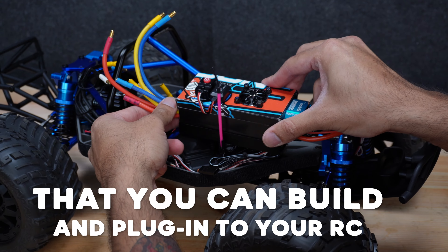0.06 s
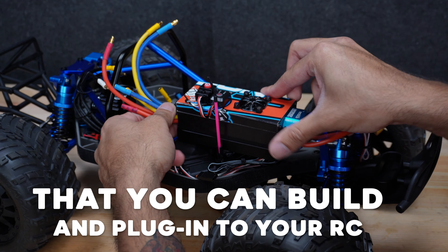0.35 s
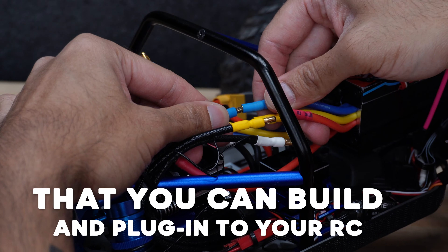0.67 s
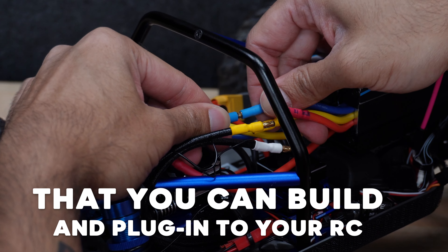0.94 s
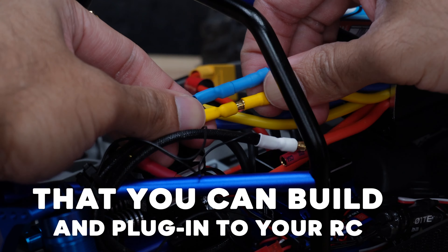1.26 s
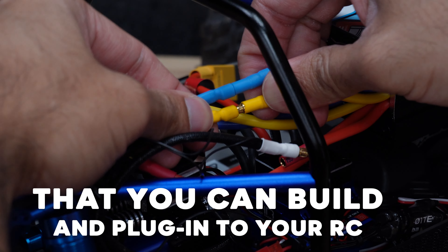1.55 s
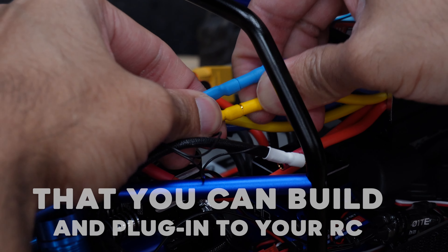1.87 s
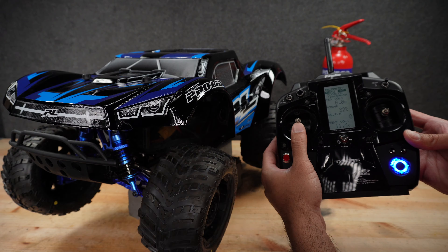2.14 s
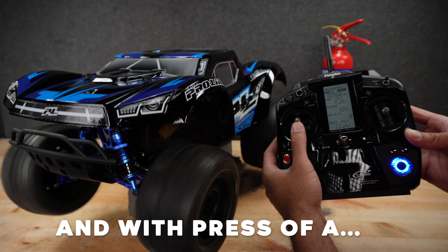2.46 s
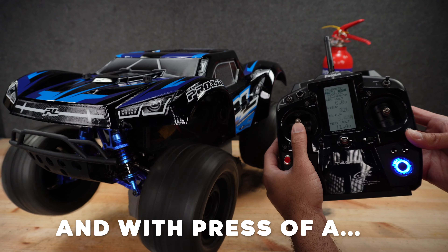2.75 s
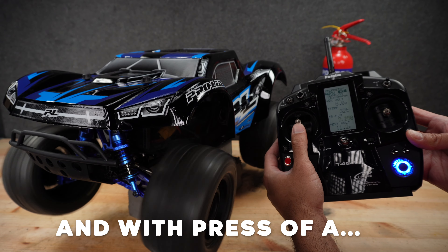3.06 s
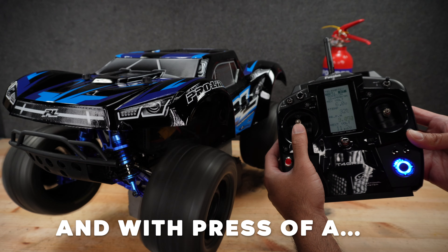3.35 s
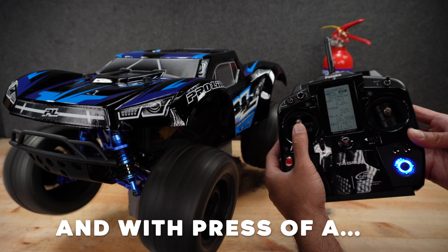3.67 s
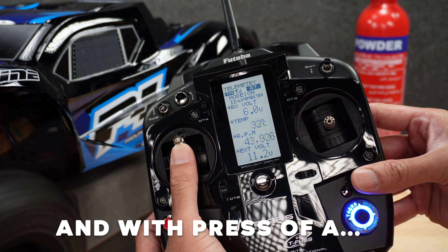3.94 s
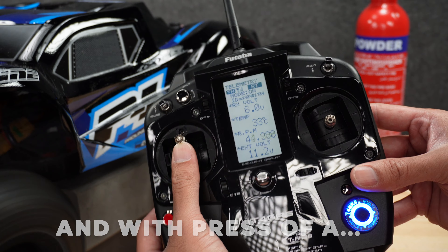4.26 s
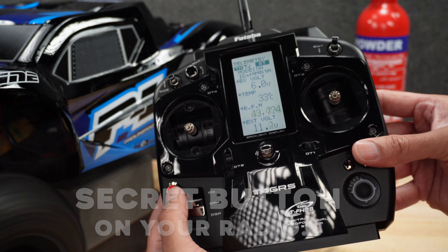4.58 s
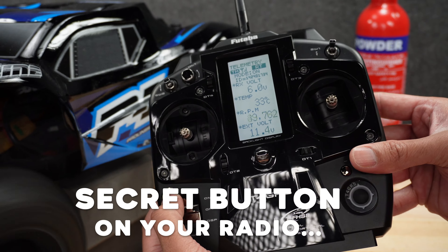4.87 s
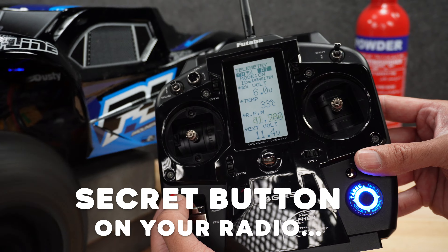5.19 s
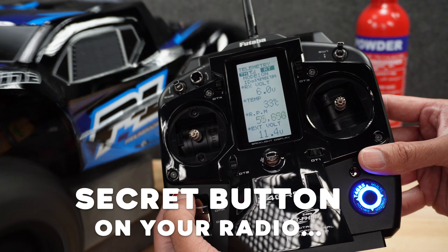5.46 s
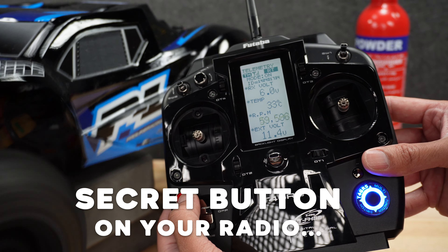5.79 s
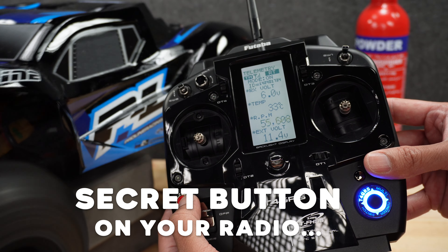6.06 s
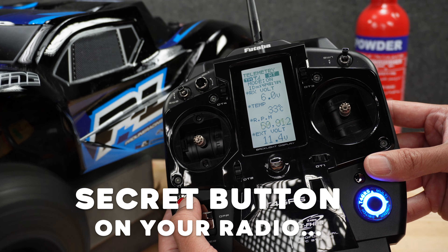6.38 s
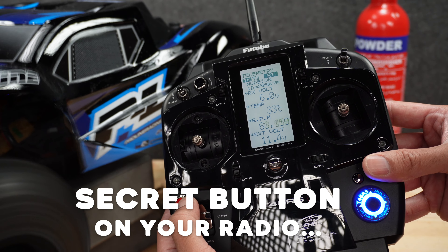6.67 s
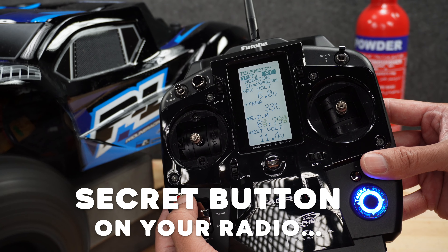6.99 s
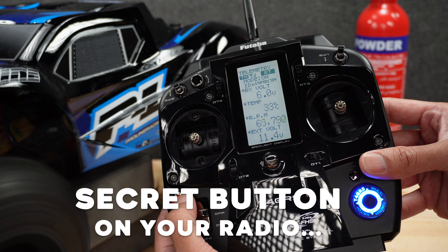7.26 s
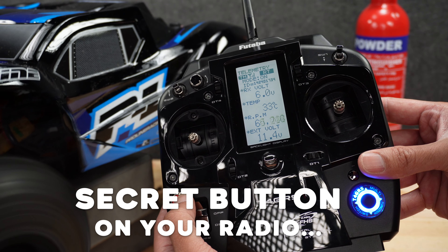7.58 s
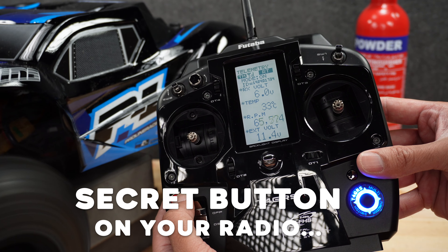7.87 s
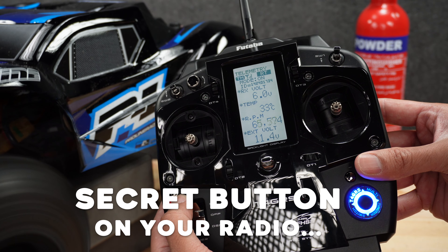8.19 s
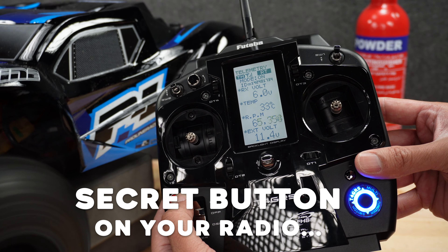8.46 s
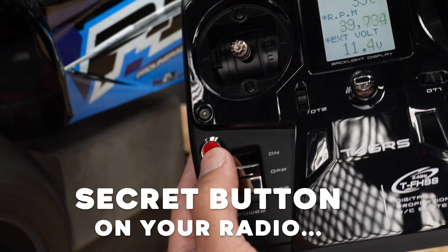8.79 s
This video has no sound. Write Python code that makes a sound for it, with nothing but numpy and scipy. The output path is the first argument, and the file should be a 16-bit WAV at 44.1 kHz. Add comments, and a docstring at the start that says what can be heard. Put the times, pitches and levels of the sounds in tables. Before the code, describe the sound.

A quiet workshop hum opens. At about 0.2 seconds a battery knocks into a model truck's plastic tray with a soft bench thump, followed by small clicks near 0.5, 1.3 and 2 seconds as plugs go in. A small fan starts softly at 2.2 seconds. At 2.4 the gears clunk and the electric motor spins the free wheels up: a loud rising whine with chattering gears, rattling shafts and low tyre shake, heard from a step away. It climbs again at 2.9, with two brief high metal squeaks around 3.5. From 3.9 seconds the sound is close, denser and brighter. It sags slightly with a thin gear squeal, rises at 4.9 and again at 5.7, then holds a high, steady, cleaner whine over the rattle. At about 8.6 seconds it drops abruptly to a lower, coasting whine.

```python
"""Clicks and knocks over a quiet workshop hum, a small fan, a clunk, then a rising, rattling whine.
A battery and motor leads are plugged into a model truck on a workbench. Its cooling fan starts, and
its brushless motor spins the free wheels up in steps to full speed, heard first from a step away,
then close by. Gear teeth whine and chatter in the gaps between them, drive shafts rattle the
chassis (the truck's frame), and unbalanced tyres shake it."""
import sys
import numpy as np
from scipy import signal
from scipy.fft import rfft, irfft, next_fast_len
from scipy.io import wavfile
from scipy.ndimage import uniform_filter1d

SR = 44100
rng = np.random.default_rng(int(sys.argv[2]) if len(sys.argv) > 2 else 0)


def log_audio(samples):
    """Write samples as a 16-bit WAV file to the path given in sys.argv[1]."""
    # one column per channel
    frames = np.atleast_2d(samples).T
    # limit to full scale, then quantise
    limited = np.clip(frames, -1, 1)
    pcm = np.round(limited * 32767).astype(np.int16)
    wavfile.write(sys.argv[1], SR, pcm)


N = 389403
TIME = np.arange(N) / SR
FREQ = np.fft.rfftfreq(N, 1 / SR)
FAN_ON_S, MOTOR_ON_S, CLOSE_S = 2.178, 2.37, 3.895  # from CLOSE_S on, the truck is heard close by
TEETH_PER_TURN = 37.58  # how often gear teeth meet in one turn of the wheels

# Pushes of the throttle. Each row: start and release in seconds, target in wheel turns per second,
# lag in seconds.
PUSHES = [(2.33, 2.88, 17.5, .19), (2.88, 3.8, 32.3, .23), (3.8, 4.35, 30.5, .25), (4.87, 5.28, 39.2, .16),
          (5.7, 8.586, 45.25, .335)]


def undb(db):
    """Turn decibels into a gain."""
    return 10 ** (np.asarray(db) / 20)


def unit(x):
    """Scale a signal to an average (rms) level of 1."""
    return x / np.sqrt(np.mean(x ** 2))


def after(s):
    """A quick fade-in starting at s seconds."""
    return np.clip((TIME - s) / 0.0092, 0, 1)


def shape(points):
    """A gain for every frequency, drawn through (Hz, dB) points."""
    hz, db = np.transpose(points)
    return undb(np.interp(np.log(FREQ + 1), np.log(hz), db))


def filtered(x, gain):
    """Give each frequency of a signal its own gain."""
    size = next_fast_len(N + 4096, True)
    return irfft(rfft(x, size) * np.interp(np.fft.rfftfreq(size, 1 / SR), FREQ, gain), size)[:N]


def noise(points):
    """Noise of level 1, coloured by (Hz, dB) points."""
    return unit(filtered(rng.standard_normal(N), shape(points)))


def wander(rate):
    """A smooth random curve of level 1 that changes about rate times a second."""
    hold = max(int(SR / rate), 1)
    steps = np.repeat(rng.standard_normal(N // hold + 1), hold)
    return unit(uniform_filter1d(uniform_filter1d(steps, hold), hold)[:N])


def sine(turns):
    """A sine wave of level 1, one cycle per turn."""
    return np.sqrt(2) * np.sin(2 * np.pi * turns)


def tones(turns, table):
    """Slightly unsteady tones that follow the turning wheels."""
    return sum(undb(db + .7 * wander(14)) * sine(multiple * turns + .03 * wander(40))
               for multiple, db in table)


def workshop():
    """The room's soft rush of air and steady hum."""
    # The air. Each row: frequency in Hz, relative level in dB.
    air = [(21, -44), (35, 2), (60, -2.5), (76, -14), (157, -3), (174, -10.5), (243, -4), (307, -11),
           (528, -5), (799, -14), (1830, -19), (1980, -22), (6160, -32), (16900, -39)]
    # The hum. Each row: pitch in Hz, level in dB.
    hum = [(247.6, -68), (586.8, -66), (1793, -75)]
    return undb(-55) * noise(air) + sum(undb(db) * sine(hz * TIME + .24 * wander(33)) for hz, db in hum)


def cooling_fan():
    """The speed controller's fan whirrs: rushing air and two tones."""
    # The moving air. Each row: frequency in Hz, relative level in dB.
    air = [(59, -76), (100, -46), (239, -14), (266, 0), (302, -32), (328, 1), (406, -27), (662, -17),
           (721, -12.5), (1060, -12), (1330, -7), (2370, -21), (4770, -24), (16000, -34)]
    # The fan's tones. Each row: pitch in Hz, level in dB.
    whirr = [(275, -79), (1378, -56.5)]
    rush = undb(-47.5) * noise(air)
    return rush + sum(undb(db) * sine(hz * TIME + .1 * wander(80)) for hz, db in whirr)


def blow(s, db, colour, ring_s, rise_s, tail_db):
    """A burst of noise that dies by 60 dB in ring_s seconds, followed by the room's faint echo."""
    age = TIME - s
    onset = np.exp(np.clip(age / rise_s, -60, 0))
    fade = undb(-60 * np.clip(age / ring_s, 0, 9)) + undb(tail_db - 60 * np.clip(age / 0.35, 0, 9))
    burst = filtered(rng.standard_normal(N), colour) * onset * fade
    return undb(db) * burst / np.max(np.abs(burst))


def battery_and_plugs():
    """Plastic rings as the battery drops into its tray and the plugs click home."""
    # The plastic's ring. Each row: frequency in Hz, relative level in dB.
    plastic = [(35, -41), (60, -10), (306, -10), (551, 4), (884, -5.5), (1150, -1.5), (1630, -7.5),
               (1930, -5), (3730, -19.5), (7220, -29), (8320, -26.5), (10500, -38), (14000, -41),
               (15700, -41), (16900, -72)]
    # Each row: time in seconds, peak in dB, treble tilt in dB per octave, ring and rise in seconds.
    clicks = [(0.151, -34.5, 7, 0.096, 0.01), (.188, -19.5, -0.5, 0.021, 0.00068),
              (.198, -21, 1.5, 0.031, 0.00041), (.363, -46, 3.5, .04, 0.0048), (0.466, -43, 6, 0.11, .004),
              (.493, -31, 3, 0.081, 0.0016), (.53, -37, 2, 0.096, .002), (1.278, -43, 5, .05, 0.0044),
              (1.975, -35.5, 8, 0.053, .0005), (2.007, -38, 2, .03, .001), (2.092, -42.5, 7, 0.019, .001)]
    octaves = np.log2(FREQ / 1000 + .1)
    return sum(blow(s, db, shape(plastic) * undb(tilt * octaves), ring_s, rise_s, tail_db=-25)
               for s, db, tilt, ring_s, rise_s in clicks)


def clunk():
    """The gears knock together as they take up their slack."""
    # The clunk's ring. Each row: frequency in Hz, relative level in dB.
    colour = [(59, -45), (100, -30), (244, -6.5), (315, -24), (634, 2.5), (854, -18), (1230, -2),
              (1830, -23), (2000, -8), (2420, -16), (10500, -25.5), (11400, -16.5), (16000, -47)]
    # The knocks. Each row: time in seconds, peak in dB, ring in seconds.
    knocks = [(2.352, -22.5, 0.049), (2.36, -21, 0.054), (2.384, -21, 0.041)]
    return sum(blow(s, db, shape(colour), ring_s, rise_s=0.0018, tail_db=-21) for s, db, ring_s in knocks)


def bench_thumps():
    """Handling and the starting jolt rock the truck on its bench."""
    # Low notes. Each row: start in seconds, pitch in Hz, peak in dB, ring in seconds.
    thumps = [(.19, 42, -40, 0.43), (0.192, 170, -54, 0.18), (0.198, 538, -41, 0.28),
              (1.978, 48, -46, 0.46), (2.373, 36.5, -35, 0.83), (2.375, 93, -37, 0.43)]
    sound = 0
    for s, hz, db, ring_s in thumps:
        age = np.maximum(TIME - s, 0)
        sound += undb(db - 60 * age / ring_s) * np.sin(2 * np.pi * hz * age)
    return sound


def squeaks(pitch_hz=11600, width_hz=1400):
    """Metal parts rub for an instant and ring high."""
    # The rubs. Each row: time in seconds, peak in dB.
    rubs = [(3.428, -35), (3.662, -28)]
    colour = 1 / (1 + ((FREQ - pitch_hz) / width_hz) ** 2)
    return sum(blow(s, db, colour, ring_s=0.12, rise_s=0.0079, tail_db=-22) for s, db in rubs)


def wheel_speed(coast_s=4.2, cut_s=8.586, after_cut_hz=29):
    """Wheel turns per second: each push pulls them toward its target, and drag slows them between."""
    hz = np.zeros(N)
    for start, release, target, lag in PUSHES:
        pushed_s = np.clip(TIME - start, 0, release - start)
        driven = target + (hz[int(start * SR)] - target) * np.exp(-pushed_s / lag)
        hz = np.where(TIME < start, hz, driven * np.exp(-np.maximum(TIME - release, 0) / coast_s))
    # at the end the sound cuts abruptly to slower, coasting wheels
    return np.where(TIME < cut_s, hz, after_cut_hz * np.exp((cut_s - TIME) / coast_s))


def gear_state(wheel_hz, top_hz=45.3, full_strain_hz_per_s=50.4, build_s=0.14):
    """Three curves, each about 0 to 1: loose gears, the strain of speeding up, and throttle off."""
    loose = np.clip((top_hz - wheel_hz) / 13, 0, 1) ** 0.37  # gears press tight near top speed
    gaining = np.maximum(np.gradient(wheel_hz) * SR, 0) / full_strain_hz_per_s
    held = sum(1. * (TIME >= start) * (TIME < release) for start, release, _, _ in PUSHES)
    span = int(build_s * SR)
    strain, coasting = (uniform_filter1d(x, span, origin=(span - 1) // 2) for x in (gaining, 1 - held))
    return loose, strain, coasting


def layer_levels(wheel_hz, strain, close, cruise_hz=30):
    """Speed and strain set the dB of the rattle, its share of treble, the whine and the tyre shake."""
    # Those four layers, from a step away and close by. Each row: relative dB at cruising speed,
    # dB added per doubling of speed, dB added at full strain.
    far_levels = [(-33, 7.5, -3), (-10, 2, -0.5), (-35.2, 12.5, -7.5), (-48, 1.5, 4)]
    near_levels = [(-24, 0.6, 2), (-4, -3, -3.5), (-29.5, 3, 3.5), (-35.5, 2, 3)]
    doublings = np.log2(np.maximum(wheel_hz, 1) / cruise_hz)
    far, near = (np.array([db + speed_db * doublings + strain_db * strain
                           for db, speed_db, strain_db in rows]) for rows in (far_levels, near_levels))
    return far * (1 - close) + near * close


def chassis(depth_db):
    """A gain curve that lifts the frequencies at which the chassis rings."""
    # Its resonances. Each row: frequency in Hz, width in Hz, relative height in dB.
    resonances = [(600, 85, 10), (1217, 150, 11), (2008, 320, 8.5), (2520, 60, 1), (2630, 67, 0.5),
                  (3150, 240, 3), (3670, 110, 2.5), (4230, 70, 4), (5300, 71, 4), (7640, 90, -2),
                  (9830, 300, -3), (15000, 420, 17)]
    peaks = sum(undb(db + depth_db) ** 2 / (1 + (2 * (FREQ - hz) / width) ** 2)
                for hz, width, db in resonances)
    return np.sqrt(1 + peaks)


def shudder(strain):
    """The chassis shudders under strain."""
    # The shudder's colour. Each row: frequency in Hz, relative level in dB.
    colour = [(25, -7), (60, -5), (110, -1), (170, -2), (260, -9), (420, -9.5), (700, -5), (1500, -38)]
    return undb(-29.5) * strain * noise(colour)


def tyres(turns, loose):
    """Unbalanced tyres shake the stand once a turn and flutter as they balloon."""
    # The shaking. Each row: shakes per wheel turn, relative level in dB.
    unbalance = [(1.002, 4.5), (2.028, 1.5), (2.149, -9), (3.03, -9), (4.05, -14), (7, -15)]
    # The flutter. Each row: frequency in Hz, relative level in dB.
    rumble = [(18, -9), (35, 9.5), (65, -18), (100, 4.5), (140, -18.5), (250, -20.5), (500, -45)]
    shake = sum(undb(db + 1.5 * wander(10)) * sine(multiple * turns + (.02 + .06 * loose) * wander(9))
                for multiple, db in unbalance)
    return undb(-3) * unit(shake) + undb(-7.5 + 6.9 * loose) * noise(rumble)


def rattle(turns, loose, treble_db, colour, depth_db, spread_db, beat_db, uneven_db, hits_per_s):
    """Many tiny impacts, bunched about twice a turn by the drive shaft joints, ring the chassis."""
    hits = (rng.random(N) < hits_per_s / SR) * rng.standard_normal(N)
    hits *= undb(spread_db * np.minimum(rng.exponential(size=N), 4))
    bunching = sine(2.4 * turns) * (1 - 0.66 * loose) + 0.35 * sine(turns)
    swell = undb(beat_db * bunching + uneven_db * wander(110))
    impacts = (unit(hits) + 0.58 * rng.standard_normal(N)) * swell
    ring = filtered(impacts, shape(colour) * chassis(depth_db))
    treble = filtered(ring, 1 / (1 + (6700 / (FREQ + 1)) ** 8))
    middle = filtered(ring, 1. * (FREQ > 2000) * (FREQ < 6500))
    return undb(-2) * (ring - treble) / np.std(middle) + undb(treble_db) * unit(treble)


def drive_shafts(turns, slow_turns, loose, close, treble_db):
    """The shafts' rattle: uneven from a step away, denser and smoother close by."""
    # Its colour at each distance. Each row: frequency in Hz, relative level in dB.
    far_colour = [(100, -13), (180, -14), (270, -1), (410, -14.5), (600, -7), (820, -16), (1150, -4.5),
                  (1550, -16.5), (2300, -9), (5200, -5), (6200, -15.5), (8000, -12), (11000, -21),
                  (15500, -42)]
    near_colour = [(100, -10.5), (170, -2), (300, -5.5), (800, -4), (1500, -2.5), (2500, -1), (3700, 3.5),
                   (5000, -3.5), (7500, -2.5), (10500, -5), (13000, -12), (15800, -18)]
    far = rattle(slow_turns, loose, treble_db, far_colour,
                 depth_db=4.5, spread_db=-0.5, beat_db=0.5, uneven_db=2.5, hits_per_s=6050)
    near = rattle(turns, loose, treble_db, near_colour,
                  depth_db=-1, spread_db=.8, beat_db=1.3, uneven_db=.4, hits_per_s=15000)
    return far * (1 - close) + undb(-1.37) * near * close


def motor_tone(turns, wheel_hz, coasting, full_hz=41.5, swell_hz=1.1):
    """The motor's magnetic tone, faint at part throttle and strong near full speed."""
    # Each row: cycles per wheel turn, level in dB at full speed.
    rotor = [(12, -32), (24, -41)]
    below_full = np.clip((full_hz - wheel_hz) / swell_hz, 0, 1)
    return undb(-13 * below_full - 8 * coasting) * tones(turns, rotor)


def squeal(turns, wheel_hz, coasting, fade_above_hz=28.8):
    """Rubbing teeth make the gearbox ring, pulsing once a turn and fading at high speed."""
    # The gearbox's notes. Each row: pitch in Hz, relative dB under throttle, relative dB coasting.
    notes = [(3346, 3, -5.5), (4190, -1, 2.5)]
    ring = sum(undb(driven_db + (coast_db - driven_db) * coasting) * sine(hz * TIME + .24 * wander(170))
               for hz, driven_db, coast_db in notes)
    level_db = -34.5 - 1.63 * np.maximum(wheel_hz - fade_above_hz, 0)
    return ring * undb(level_db + 2.5 * sine(turns + .25) + 1.5 * wander(110))


def tight_gears(turns, loose):
    """Gears pressed tightly together sing in clean tones."""
    # Each row: cycles per wheel turn, relative level in dB.
    clean_tones = [(36.45, -38), (37.58, -45), (73, -41), (75.16, -37), (76.16, -44), (77.19, -47),
                   (110.55, -45), (114.77, -46)]
    return undb(2.5) * np.clip(1 - loose / .9, 0, 1) * tones(turns, clean_tones)


def chatter():
    """How many dB the whine rises while the teeth briefly knock in step."""
    # The bursts. Each row: middle in seconds, rise in dB, half-length in seconds.
    bursts = [(2.7, 7.5, .045), (2.787, 17.5, .007), (3.138, 12.5, .008), (3.218, 7, .009),
              (3.283, 6, .014), (3.373, 4, .012), (3.435, 4, .014)]
    return sum(db * np.exp(-((TIME - s) / length) ** 2) for s, db, length in bursts)


def gear_beat(turns, slow_turns, slack, close):
    """Loose gears load and unload: gives a throb in dB and a pitch-bending swoop in wheel turns."""
    far = np.array([2.7 * sine(slow_turns), .012 * sine(slow_turns + .4)])
    near = np.array([1.2 * sine(turns), .0039 * sine(turns + .48)])
    throb_db, swoop = far * (1 - close) + near * slack * close
    shaft_db = 2.26 * sine(turns) + 0.7 * sine(2.03 * turns)  # the off-centre shaft and its joints
    return throb_db + shaft_db * close, swoop


def gear_overtones(mesh, turns, wheel_hz, loose, strain, close, crawl, swell_db, rattle_db):
    """The gearbox gives off flickering higher tones, 2 to 8 times the rate at which teeth meet."""
    # How well it gives them off. Each row: frequency in Hz, relative level in dB.
    gearbox = [(700, -3), (1200, -15.5), (1700, -25), (2300, -12), (2800, -7), (3400, -8.5), (4000, -9.5),
               (4600, -9), (5100, -12), (5800, -11), (6800, -13), (8200, -22.5), (10200, -14), (13000, -23)]
    hz, db = np.transpose(gearbox)
    overtones = 0
    for k in range(2, 9):
        gearbox_db = np.interp(k * TEETH_PER_TURN * wheel_hz, hz, db)
        third_db = 0.5 * (k == 3) * close  # loose teeth knock on both sides, which favours the third
        loose_db = loose * (2.2 * wander(120) - 0.75 * (k - 2) + third_db)
        level_db = rattle_db + gearbox_db + loose_db + 0.11 * swell_db - 4 * crawl
        smear = (.13 * loose + .25 * strain * close) * wander(260)
        overtones += undb(level_db) * sine(k * mesh + smear)
    # tight teeth press hardest twice a turn, as the shaft joints pass
    overtones *= undb(3 * (1 - loose) * sine(2.03 * turns))
    # from a step away they arrive through the shell, which passes only its own resonances
    shell = (chassis(4) - 1) / (1 + (FREQ / 5600) ** 10)
    return undb(1) * filtered(overtones, shell) * (1 - close) + undb(-2) * overtones * close


def gear_whine(turns, wheel_hz, loose, strain, close, whine_db, rattle_db):
    """Teeth meeting in quick succession make a tone; loose teeth slip in their gaps and smear it."""
    sway = .06 * sine(turns) + .062 * sine(2.03 * turns + .2)  # the off-centre shaft and its joints
    crawl = np.clip((27 - wheel_hz) / 8, 0, 1)  # at low speed the teeth knock freely
    slip = loose * ((.04 + .18 * crawl) * wander(260) + .18 * wander(45)) + .007 * wander(500)
    chatter_db = chatter()
    mesh = TEETH_PER_TURN * turns + sway + slip / undb(chatter_db)  # counts the teeth that have met
    swell_db = 4 * loose * wander(90) / undb(chatter_db) + chatter_db
    main_tone = sine(mesh + 0.23 * loose * wander(220)) * undb(swell_db - 2.1 * (1 - loose) ** 2)
    octave = crawl * sine(2 * mesh) * undb(swell_db - 0.5)
    whine = undb(whine_db - 8 - 3.95 * close) * filtered(main_tone + octave, chassis(-0.8))
    return whine + gear_overtones(mesh, turns, wheel_hz, loose, strain, close, crawl, swell_db, rattle_db)


def drivetrain():
    """One wheel speed drives the rattle, gear whine, motor tone and tyre shake."""
    wheel_hz = wheel_speed()
    loose, strain, coasting = gear_state(wheel_hz)
    relaxed = np.clip(1 - strain, 0, 1)  # strain holds the teeth together
    close = after(CLOSE_S)
    rattle_db, treble_db, whine_db, shake_db = layer_levels(wheel_hz, strain, close)
    turns = np.cumsum(wheel_hz * (1 + 0.000536 * wander(8))) / SR
    slow_turns = .68 * turns  # early on, the clatter beats slower than the wheels turn
    clatter = undb(rattle_db) * drive_shafts(turns, slow_turns, loose, close, treble_db)
    throb_db, swoop = gear_beat(turns, slow_turns, loose ** 2 * relaxed, close)
    whine = gear_whine(turns + swoop, wheel_hz, loose, strain, close, whine_db, rattle_db)
    gears = undb(throb_db / undb(chatter())) * whine + tight_gears(turns, loose)
    close_only = shudder(strain) + motor_tone(turns, wheel_hz, coasting)
    close_only += relaxed * squeal(turns, wheel_hz, coasting)
    shake = undb(shake_db) * tyres(turns, loose)
    return after(MOTOR_ON_S) * (clatter + gears + close * close_only + shake)


def scene():
    """All the sounds in one channel; the fan takes over from the workshop hum."""
    fan_on = after(FAN_ON_S)
    background = workshop() * (1 - fan_on) + cooling_fan() * fan_on
    knocks = battery_and_plugs() + clunk() + bench_thumps()
    return (background + knocks + drivetrain() + squeaks())[None]


def record(dry):
    """Round off the highest peaks and cut the very top of the treble."""
    ceiling, top_hz = .36, 15800
    rounded = dry / (1 + (dry / ceiling) ** 4) ** .25
    return signal.sosfilt(signal.ellip(10, .2, 80, top_hz, fs=SR, output="sos"), rounded)


dry = scene()
out = record(dry)
log_audio(out)
```